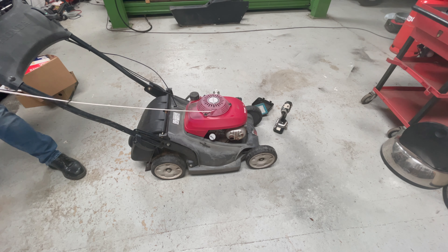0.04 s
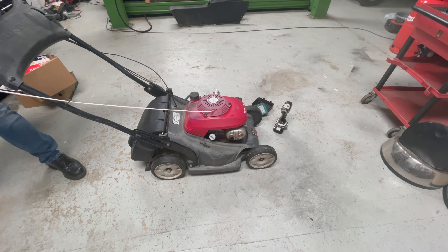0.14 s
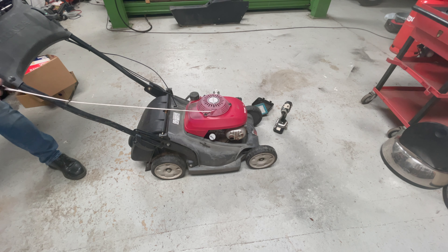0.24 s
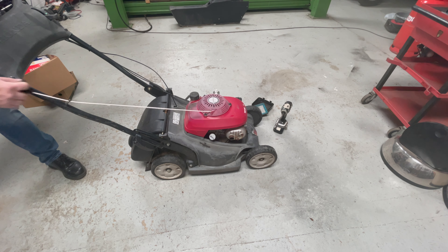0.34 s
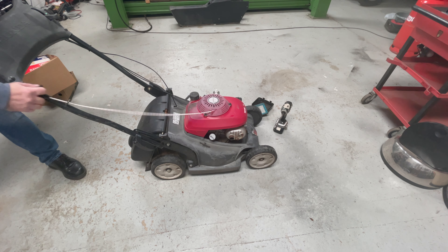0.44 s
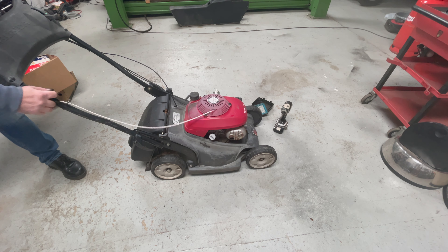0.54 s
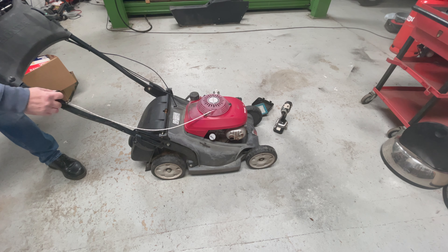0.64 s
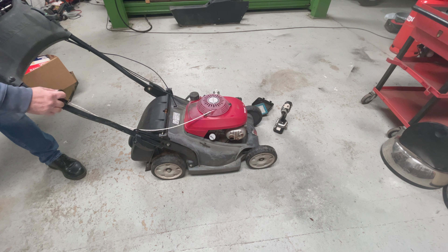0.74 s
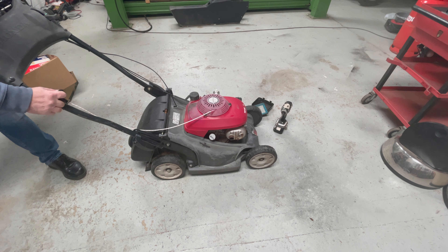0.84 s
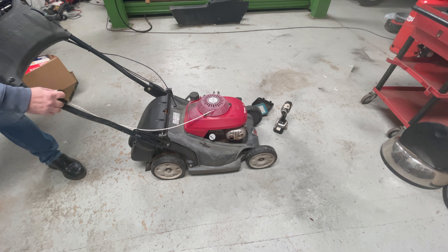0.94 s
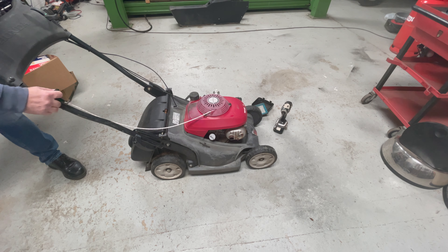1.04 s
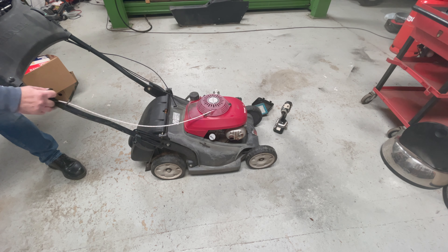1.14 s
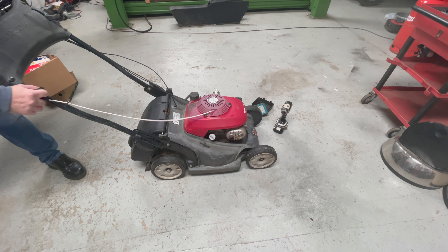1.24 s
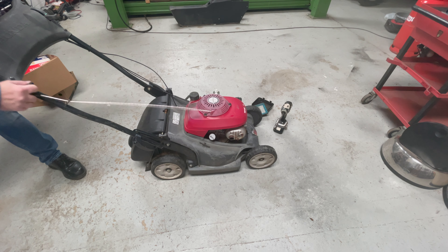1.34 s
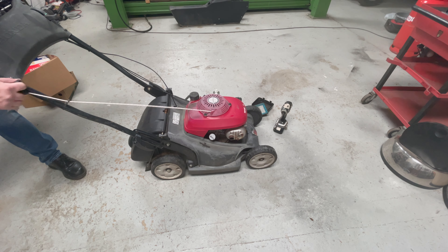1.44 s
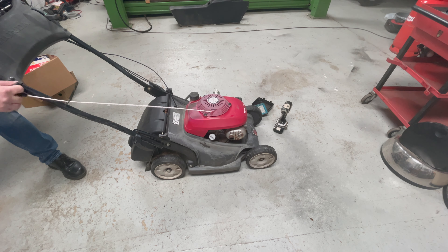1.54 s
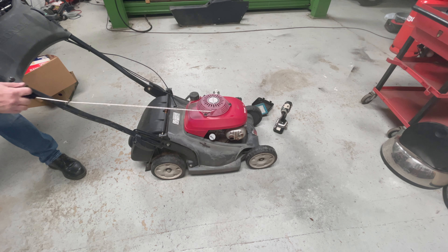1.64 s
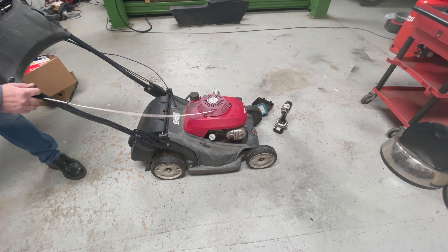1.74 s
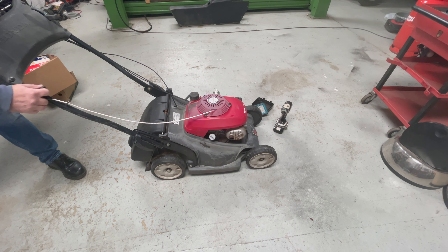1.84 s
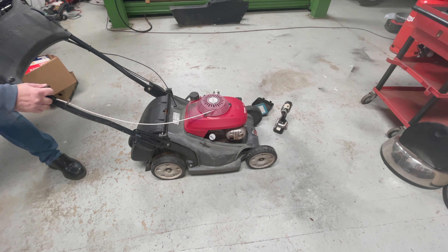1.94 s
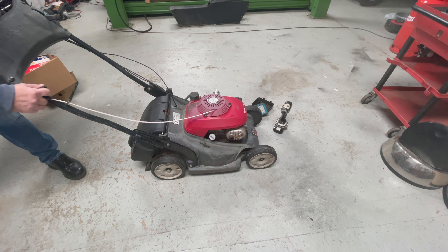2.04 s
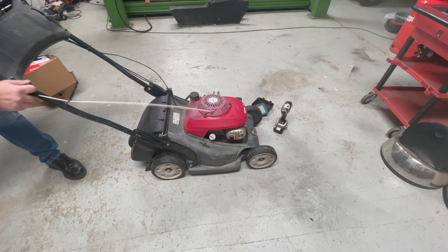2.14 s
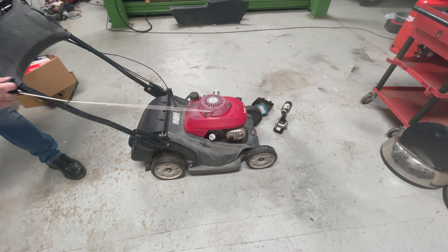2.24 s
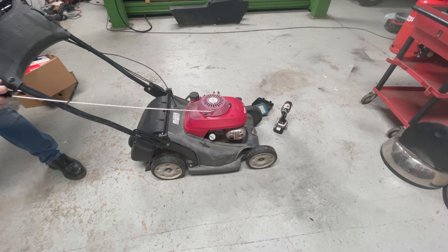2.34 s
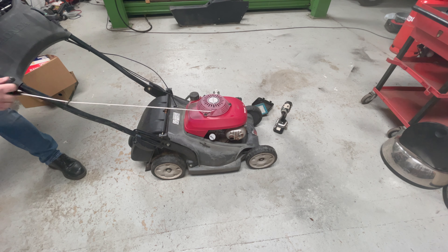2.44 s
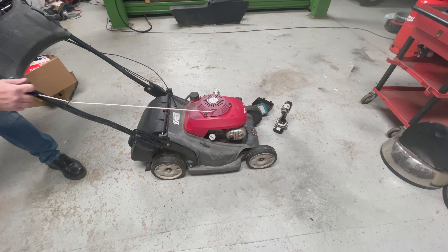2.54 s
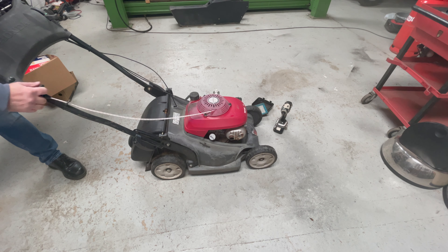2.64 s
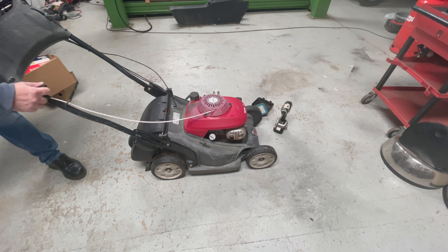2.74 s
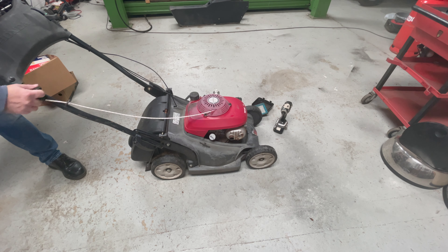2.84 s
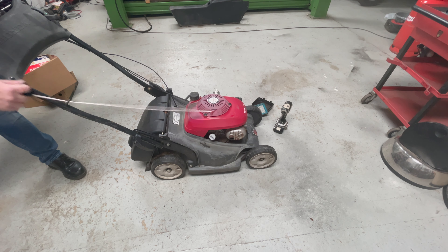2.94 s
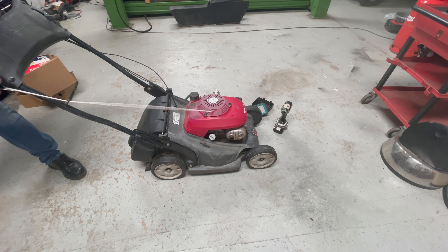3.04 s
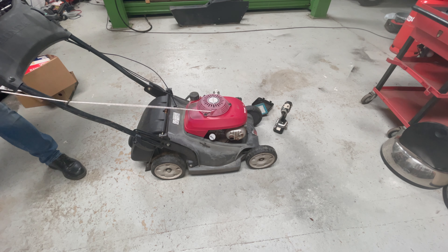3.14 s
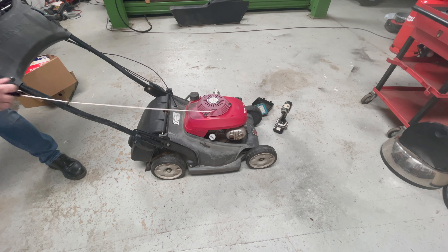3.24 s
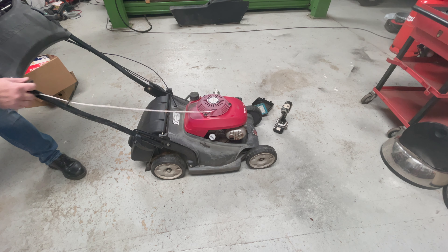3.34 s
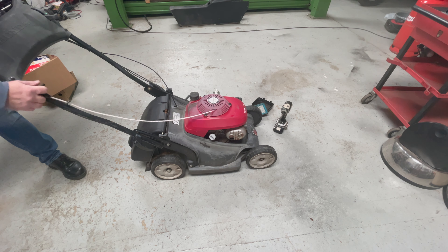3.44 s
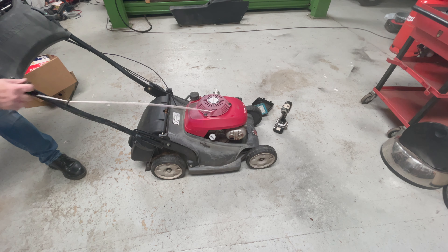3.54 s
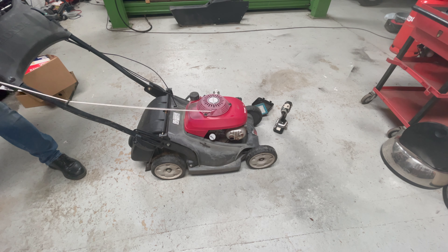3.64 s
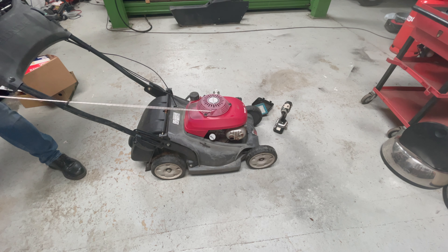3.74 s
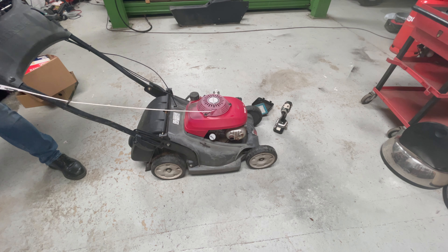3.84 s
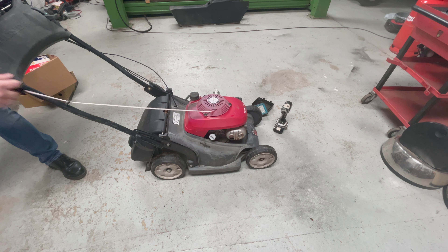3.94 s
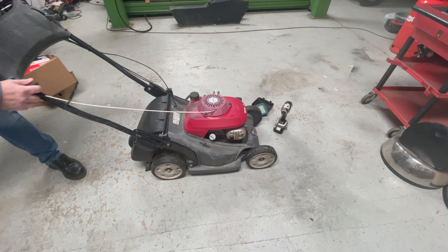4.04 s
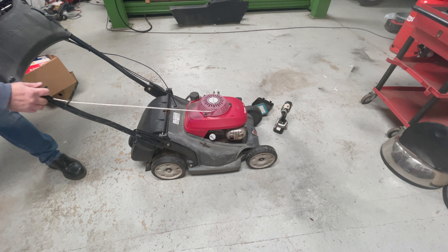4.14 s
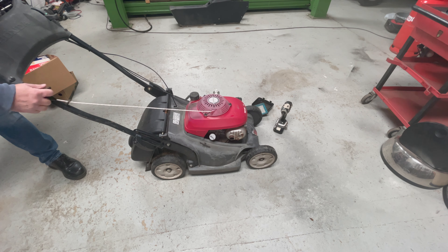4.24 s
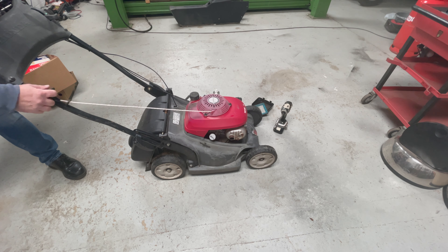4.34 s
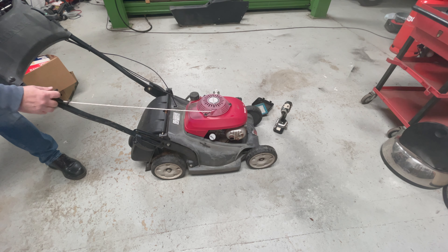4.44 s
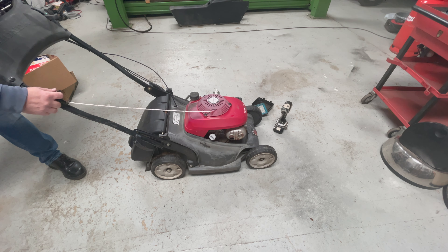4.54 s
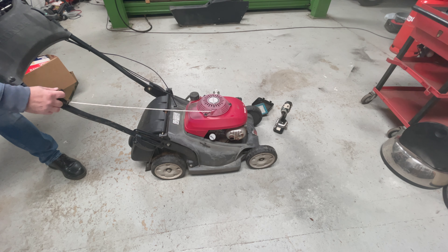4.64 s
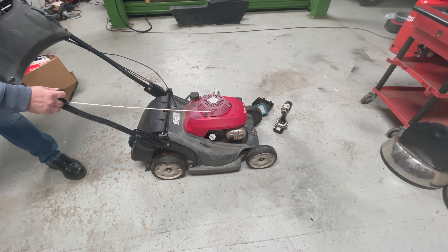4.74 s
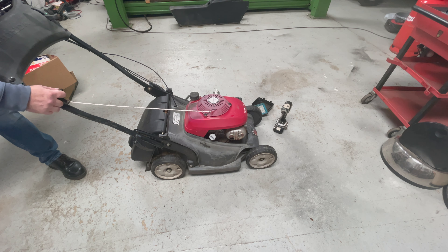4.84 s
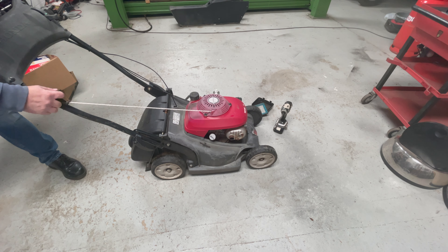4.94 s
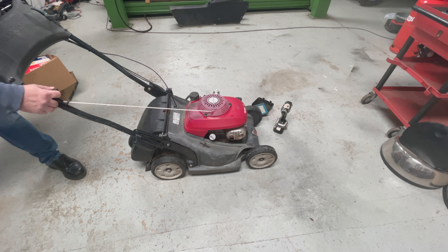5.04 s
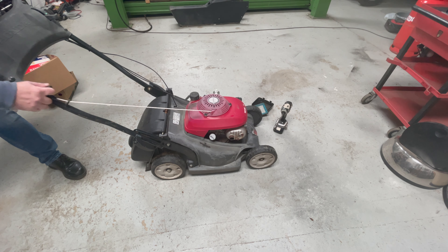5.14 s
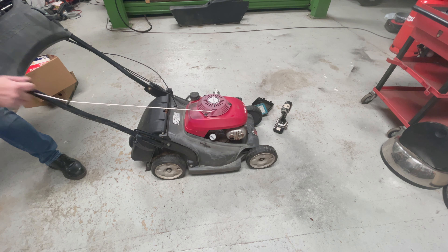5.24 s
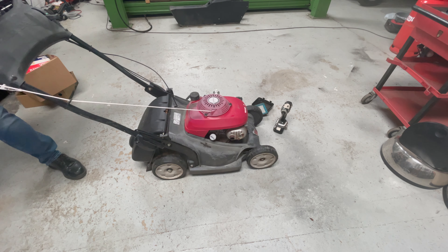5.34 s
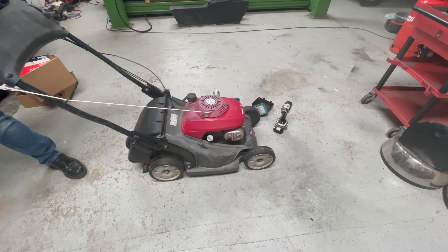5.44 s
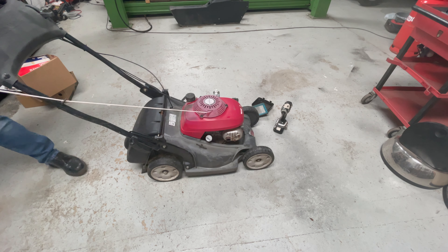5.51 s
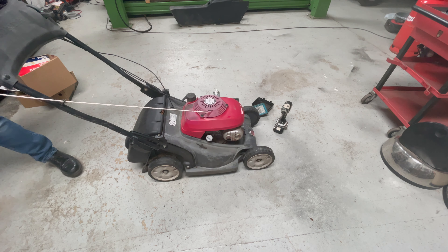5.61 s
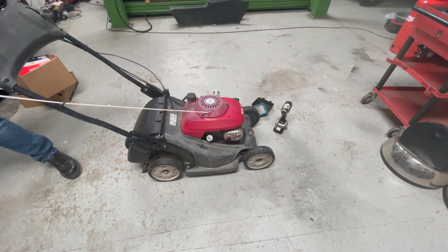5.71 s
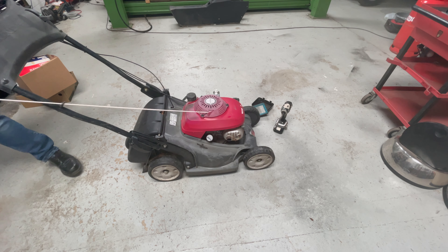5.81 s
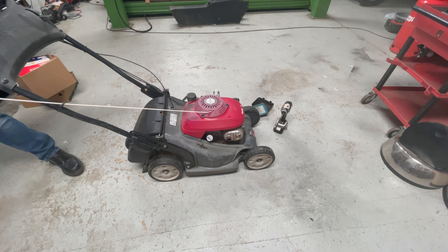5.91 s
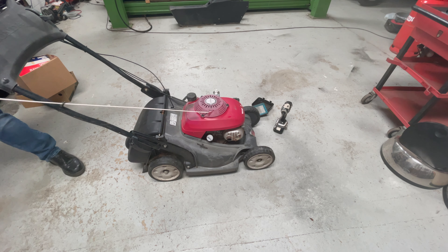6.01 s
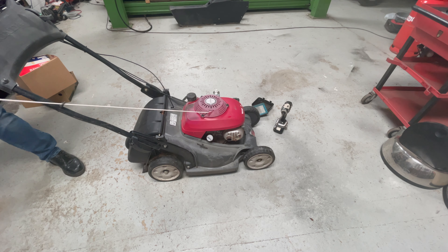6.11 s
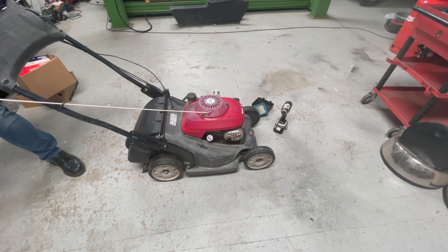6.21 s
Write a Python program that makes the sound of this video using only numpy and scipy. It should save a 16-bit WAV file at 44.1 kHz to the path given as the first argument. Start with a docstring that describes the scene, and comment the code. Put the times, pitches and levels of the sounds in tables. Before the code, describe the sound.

A mower's starter cord is eased out and let back in a garage, pawls clicking, then one hard yank cranks the engine without starting.

```python
"""Cranking a petrol lawn mower

In a garage a starter cord is eased out and let back several times: friction noise for cord and reel,
decaying noise bursts and sine modes for the steel pawls that clink and catch on the flywheel cup.
Then one hard pull spins the engine: it chuffs over compression as struck modes with puffs of noise,
shakes the deck and coasts while the cord runs back. Hard walls answer with a diffuse noise tail.
"""
import sys
import numpy as np
from scipy import signal
from scipy.fft import rfft, irfft, next_fast_len
from scipy.io import wavfile
from scipy.ndimage import uniform_filter1d, map_coordinates

SR = 44100
rng = np.random.default_rng(int(sys.argv[2]) if len(sys.argv) > 2 else 0)


def wav_out(sig):
    """Save sig, one row per channel (or a flat mono array), as 16-bit PCM at SR to the path in sys.argv[1]."""
    wavfile.write(sys.argv[1], SR, np.round(np.clip(np.atleast_2d(sig).T, -1, 1) * 32767).astype(np.int16))


N = 276507
TOP_HZ = 15900  # upper band limit

# A loose pawl drops on its stop: (time [s], relative level [dB])
CLINKS = [(1.1362, -49), (1.262, -65), (2.015, -53.5), (2.7856, -61.5)]
# Resonances of the starter housing: (frequency [Hz], width [Hz], relative level [dB])
HOUSING = [(350, 36, 0), (485, 32, -1), (685, 45, -2), (796, 45, -1), (945, 45, -4), (1135, 55, 1),
           (1225, 50, 1), (1420, 45, -1), (1610, 70, -2), (1830, 65, 0), (2380, 130, 0), (3520, 110, -1),
           (4100, 110, -3), (5100, 170, 1), (6930, 160, -3)]


def amp(db):
    """Level to amplitude ratio: 20 dB is a factor of ten."""
    return 10 ** (np.asarray(db) / 20)


def unit(x):
    """Normalisation to a root-mean-square of 1."""
    return x / np.sqrt(np.mean(x ** 2) + 1e-20)


def along(points, hz):
    """Linear interpolation of (frequency [Hz], value) points on a logarithmic frequency axis."""
    f, v = np.transpose(points)
    return np.interp(np.log(hz + 1), np.log(f + 1), v)


def wobble(rate):
    """Slow random modulation: a smooth curve through random knots, rate of them a second."""
    knots = rng.standard_normal(int(N * rate / SR) + 4)
    return map_coordinates(knots, [np.arange(N) * rate / SR])


def filtered(x, response):
    """Linear filtering: the spectrum of x times a response of frequency."""
    n = x.shape[-1]
    padded = next_fast_len(n + 8192, real=True)
    return irfft(rfft(x, padded) * response(np.fft.rfftfreq(padded, 1 / SR)), padded)[..., :n]


def resonant(peaks, hz):
    """Resonance: power sum of second-order band-pass peaks (centre [Hz], width [Hz], level [dB])."""
    power = 0
    for centre, width, db in peaks:
        detuning = (hz * hz - centre * centre) / (hz * width + 1e-6)
        power = power + amp(db) ** 2 / (1 + detuning ** 2)
    return np.sqrt(power)


def shape(spectrum):
    """Spectral envelope: the gain of (frequency [Hz], level [dB]) points as a function of frequency."""
    return lambda hz: amp(along(spectrum, hz))


def housed(spectrum, standing_db):
    """Source and resonator: a spectrum with the starter housing's resonances standing out of it."""
    return lambda hz: amp(along(spectrum, hz)) * np.hypot(1, amp(standing_db) * resonant(HOUSING, hz))


def noise(response, size=N):
    """Coloured noise: two unrelated random signals, together of rms 1."""
    return unit(filtered(rng.standard_normal((2, size)), response))


def burst(response, t60, attack):
    """High modal density: a cloud of modes, heard as noise, that swells and decays exponentially."""
    t = np.arange(SR // 2) / SR
    return noise(response, size=len(t)) * amp(-60 * t / t60) * (1 - np.exp(-t / attack))


def ring(modes, attack):
    """Modal vibration: decaying sines, with new strengths and phases at every blow."""
    t = np.arange(SR // 2) / SR
    tone = 0
    for hz, db, t60 in modes:
        decay = amp(db + rng.normal(0, 2.3) - 60 * t / t60)
        tone = tone + decay * np.sin(2 * np.pi * (hz * t + rng.random((2, 1))))
    return tone * (1 - np.exp(-t / attack))


def add(track, s, sound):
    """Superposition: mix a sound into the track at time s."""
    part = track[:, max(round(s * SR), 0):][:, :sound.shape[1]]
    part += sound[:, :part.shape[1]]


def scrape(response, rate, grain_db):
    """Sliding friction: noise broken into tiny slips, rate a second."""
    return unit(noise(response) * amp(grain_db * wobble(rate)))


def patchy(x, depth_db):
    """Random band modulation: each narrow band swells and fades on its own."""
    z = signal.stft(x, nperseg=512)[2]
    field = rng.standard_normal(z.shape[1:])
    field = uniform_filter1d(field, size=3, axis=0)  # over frequency
    field = uniform_filter1d(field, size=7, axis=1)  # over time
    return unit(signal.istft(z * amp(depth_db * unit(field)), nperseg=512)[1][:, :N])


def stroke(s, length, db, rise, fade_db_per_s, drag_db_per_s=0):
    """Speed envelope: a motion is up to speed at s, drags for its length and then dies away."""
    t = np.arange(N) / SR - s
    held_db = db - drag_db_per_s * np.clip(t, 0, length) - fade_db_per_s * np.maximum(t - length, 0)
    return amp(held_db) * np.exp(-(np.minimum(t, 0) / rise) ** 2)


def rumble():
    """Stationary background noise: the garage's quiet, low-pitched floor."""
    # Spectrum of the floor: (frequency [Hz], relative density [dB per Hz])
    floor_spectrum = [(15, -40), (28, -13), (48, -4.5), (60, 4.5), (78, -1), (110, -5), (210, -7.5),
                      (410, -11), (560, -22), (1000, -25.5), (2300, -28.5), (3200, -47), (5000, -41),
                      (5600, -50), (6800, -34), (7500, -48), (13000, -53), (16000, -62)]
    return amp(-61.5) * noise(shape(floor_spectrum))


def garage(x):
    """Diffuse reverberation: the walls' answer, each frequency decaying at its own speed."""
    # Reverberation time: (frequency [Hz], t60 [s])
    wall_decay = [(100, 0.79), (700, 0.51), (2000, 0.62), (5000, 0.68), (13000, 0.23)]
    hz, t, z = signal.stft(rng.standard_normal((2, SR)), SR, nperseg=256)
    decay = amp(-60 * t / along(wall_decay, hz)[:, None])
    build_up = 1 - np.exp(-t / 0.0049)
    tail = signal.istft(z * decay * build_up, SR, nperseg=256)[1]
    return signal.fftconvolve(x, tail / np.linalg.norm(tail[0]), axes=1)[:, :N]


def ports(pair):
    """Interchannel coherence: two signals become left and right, alike in the bass, out of step in the treble."""
    # Likeness of the channels: (frequency [Hz], coherence [0-1])
    coherence = [(60, .97), (200, .92), (430, .65), (850, .42), (1700, .35), (3500, .42), (6000, .25),
                 (8700, .42), (12000, .76)]
    # Phase by which the left leads: (frequency [Hz], lead [rad])
    phase_lead = [(60, .05), (200, .3), (430, .65), (850, 1.1), (1700, 1.0), (3500, 2.2), (6000, 2.9),
                  (8700, 2.2), (11500, .3)]
    # Level difference: (frequency [Hz], left minus right [dB])
    balance = [(60, -3), (200, -0.9), (850, 1.1), (3500, 1.6), (6400, 3.5), (8700, -4.5), (11500, -0.5)]

    def spread(hz):
        alike = np.clip(along(coherence, hz), 0, .99)
        lead = along(phase_lead, hz)
        common, apart = np.sqrt(1 + alike), np.sqrt(1 - alike)
        left = amp(along(balance, hz) / 2) * np.exp(.5j * lead)
        matrix = np.array([[common * left, apart * left], [common / left, -apart / left]])
        return matrix / np.sqrt(1 + alike * np.cos(lead))  # offsets gain or loss in the sum of the channels

    return filtered(pair, spread).sum(axis=1)


def cup(hz):
    """Resonance of a steel shell: the flywheel cup's response."""
    # Modes of the cup: (frequency [Hz], width [Hz], relative level [dB] before squaring)
    cup_modes = [(2400, 140, -3), (5950, 150, -6), (6600, 220, 0), (6980, 200, -4)]
    return resonant(cup_modes, hz) ** 2


def cord(whirr, rub, hiss, bright_db):
    """Friction and rattle: the reel rattles and jingles the pawls as the braid rubs and hisses in its guide."""
    # Spectrum of the reel in its housing: (frequency [Hz], relative density [dB per Hz])
    reel_spectrum = [(76, -34), (130, -4.5), (210, 4), (280, -3), (360, 1), (560, 0.5), (1200, -4.5),
                     (1650, -4), (2000, -8.5), (2450, -8.5), (3500, -19.5), (6000, -54)]
    # Spectrum of the cord rubbing its guide: (frequency [Hz], relative density [dB per Hz])
    rub_spectrum = [(1400, -47), (2300, -9), (3000, -2), (4500, 1.5), (5100, -1), (5700, -4.5),
                    (6300, -0.5), (7000, -6.5), (7450, -15), (9900, -8), (16000, -70)]
    # Spectrum of the hissing braid: (frequency [Hz], relative density [dB per Hz])
    hiss_spectrum = [(3800, -25), (6500, -2), (7000, 0), (7500, -8.5), (8200, 0), (9600, -1),
                     (10600, -15.5), (12000, -3.5), (13300, -5.5), (14300, -6.5), (16000, -21.5)]

    rattle = scrape(housed(reel_spectrum, standing_db=0), rate=260, grain_db=1.5)
    reel = amp(-1.5) * whirr * patchy(rattle, depth_db=2.5)
    jingle = amp(-27.5) * whirr * noise(cup)
    rubbing = scrape(housed(rub_spectrum, standing_db=2), rate=420, grain_db=1)
    guide = amp(2.0) * rub * patchy(rubbing, depth_db=2.5)
    # bright_db lifts or lowers the top treble
    braid = lambda hz: amp(along(hiss_spectrum, hz) + bright_db * (hz / TOP_HZ) ** 4)
    hissing = scrape(braid, rate=1100, grain_db=2.0)
    fibres = amp(1.5) * hiss * patchy(hissing, depth_db=4.5)
    return reel + jingle + guide + fibres


def easing():
    """Speed-dependent friction: tugs mostly hiss, the reel mostly whirrs; its rub and hiss die first."""
    # The hand draws the cord through its guide: (time [s], length [s], relative hiss level [dB])
    tugs = [(0.0, .045, -50.5), (0.3, .025, -51.5), (1.36, .04, -63), (1.55, .08, -63), (2.14, .06, -58),
            (2.44, .06, -58.5), (2.98, .045, -53), (3.125, .015, -62), (3.19, .1, -57.5), (3.57, .08, -51),
            (3.86, .11, -53), (4.06, .04, -65), (4.28, .06, -70), (5.0, .06, -70), (5.11, .05, -62),
            (5.2, .02, -55), (6.0, .05, -54), (6.17, .1, -49.5)]
    # The reel is set spinning and runs down: (time [s], length [s], relative whirr level [dB])
    spins = [(0.03, .54, -44), (1.16, .02, -68), (1.38, .26, -55.3), (2.14, .36, -51.8), (2.72, .15, -63.5),
             (2.94, .46, -51.6), (3.68, .88, -47.2), (4.89, .08, -65), (5.07, .14, -55.5),
             (5.99, .28, -44.3)]
    tug_rise_s, tug_fade_db_per_s = .035, 215
    tug_whirr_db, tug_rub_db = -2.5, -6.5  # beside the hiss
    spin_rise_s, spin_drag_db_per_s, spin_stop_db_per_s = .03, 14, 54
    brisk_db = -45  # the whirr of a briskly turning reel
    spin_rub_db, rub_power = -11.3, 1.6  # beside a brisk whirr; exponent of the speed
    spin_hiss_db, hiss_power = -21, 1.9  # likewise

    tug = np.sqrt(sum(stroke(*row, tug_rise_s, tug_fade_db_per_s) ** 2 for row in tugs))
    spin = np.sqrt(sum(stroke(*row, spin_rise_s, spin_stop_db_per_s, spin_drag_db_per_s) ** 2
                       for row in spins))
    speed = spin / amp(brisk_db)
    whirr = np.hypot(amp(tug_whirr_db) * tug, spin)
    rub = np.hypot(amp(tug_rub_db) * tug, amp(brisk_db + spin_rub_db) * speed ** rub_power)
    hiss = np.hypot(tug, amp(brisk_db + spin_hiss_db) * speed ** hiss_power)
    return cord(whirr, rub, hiss, bright_db=-3)


def spring():
    """Stick-slip: the coils tick against their case as the cord winds in, and the housing rings on."""
    # The rewind spring's coils slip: (time [s], relative level [dB])
    slips = [(0.036, -37), (2.277, -49), (3.861, -44), (3.921, -44), (4.052, -37), (4.099, -37.5),
             (4.205, -37.5), (4.335, -38), (4.522, -38)]
    # Spectrum of a tick: (frequency [Hz], relative density [dB per Hz])
    tick_spectrum = [(290, -49), (500, -6), (1270, 1.5), (2100, -9), (2470, -4), (3090, -16), (4990, -18),
                     (5480, -29), (6510, -13.5), (9450, -23), (10800, -30), (12000, -26), (15600, -64),
                     (22000, -120)]
    out = np.zeros((2, N))
    tick = shape(tick_spectrum)
    housing = lambda hz: tick(hz) * resonant(HOUSING, hz) ** 2
    for s, db in slips:
        add(out, s, amp(db - 4) * burst(tick, t60=0.049, attack=0.00095))
        add(out, s, amp(db - 10.5) * burst(housing, t60=0.15, attack=.002))
    return out


def contacts():
    """Impact and damping: rows (s, knock, clack, crack, ring dB); a free pawl rings, a held one barely."""
    # A pawl catches in the flywheel cup: (time [s], relative clack level [dB])
    catches = [(0.63, -41.3), (1.306, -40.5), (1.655, -45), (2.107, -32.5), (2.896, -32.5), (3.504, -33.5),
               (4.979, -49.5)]
    # The loaded starter jolts with its pawls held fast:
    # (time [s], crack [dB], housing clack [dB], deck knock [dB]), all relative levels
    jolts = [(1.325, -39, -35.5, -60), (3.607, -23.3, -40, -53), (3.629, -22, -31, -35),
             (5.221, -23.5, -38.5, -44), (5.242, -12.5, -23.5, -29), (5.452, -22.5, -38, -35),
             (5.515, -27, -37, -45), (5.546, -21.5, -29, -34), (5.567, -18.5, -29, -41),
             (5.609, -23, -37, -30), (5.639, -22, -29, -35), (5.798, -26.5, -38, -49),
             (5.85, -31.5, -36.5, -31), (5.937, -32.5, -39.5, -42), (6.245, -37, -42, -52)]
    firm_db = -33  # clack of a firm catch
    catch_knock_db, catch_crack_db, catch_ring_db = -13, -3, -9.5  # beside that clack
    hardening = 1.35  # knock, crack and ring grow faster with force than the clack
    jolt_ring_db = -26  # beside the crack

    rows = []
    for s, db in catches:
        hard_db = firm_db + hardening * (db - firm_db)
        rows.append((s, hard_db + catch_knock_db, db, hard_db + catch_crack_db, hard_db + catch_ring_db))
    for s, crack_db, clack_db, knock_db in jolts:
        rows.append((s, knock_db, clack_db, crack_db, crack_db + jolt_ring_db))
    return rows


def pings():
    """Free vibration: every contact sets the small steel pawl ringing in its modes."""
    # Modes of the steel pawl: (frequency [Hz], relative level [dB], t60 [s])
    pawl_modes = [(2390, -19, .15), (4040, -26, .1), (6545, -5, .07), (6595, 0, .11), (6670, -10, .08)]
    out = np.zeros((2, N))
    for s, *_, ring_db in contacts():
        add(out, s, amp(ring_db + 4.5) * ring(pawl_modes, attack=0.0022))
    for s, db in CLINKS:
        add(out, s, amp(db - 4.5) * ring(pawl_modes, attack=.002))
    return out[:1]  # one channel


def pawls():
    """Impact excitation: a pawl scuffs along the cup, cracks home, clacks the housing and knocks the deck."""
    # Spectrum of the steel crack: (frequency [Hz], relative density [dB per Hz])
    crack_spectrum = [(1200, -27), (2000, 0.5), (2400, -0.5), (3500, -3), (5100, -2), (5700, -4),
                      (6800, 0.5), (7500, -2), (9400, -2.5), (10700, -10), (13300, -7.5), (16000, -20)]
    # Spectrum of the housing's clack: (frequency [Hz], relative density [dB per Hz])
    clack_spectrum = [(200, -1), (400, 0), (800, 3), (1600, -2), (2600, -10.5), (4000, -11.5), (6000, -18),
                      (9000, -60)]
    # Modes of the deck: (frequency [Hz], width [Hz], relative level [dB] before squaring)
    deck_modes = [(211, 38, -2.5), (350, 30, -7), (497, 22, -5.5)]
    out = np.zeros((2, N))
    crack = housed(crack_spectrum, standing_db=1.5)
    clack = housed(clack_spectrum, standing_db=-5)
    knock = lambda hz: resonant(deck_modes, hz) ** 2
    for s, knock_db, clack_db, crack_db, ring_db in contacts():
        add(out, s - .006, amp(clack_db - 14) * burst(crack, t60=0.077, attack=0.007))  # scuff
        add(out, s, amp(crack_db - 4.5) * burst(crack, t60=0.048, attack=0.00083))
        add(out, s, amp(clack_db + 2.5) * burst(clack, t60=.08, attack=0.0043))
        add(out, s, amp(knock_db + 0.5) * burst(knock, t60=0.18, attack=0.0063))
        add(out, s, amp(ring_db + 3.5) * burst(cup, t60=0.077, attack=.0015))
    for s, db in CLINKS:
        add(out, s, amp(db - 20) * burst(crack, t60=0.045, attack=.001))
    return out


def piston():
    """Pulsed flow into cavities: each push of air thumps the airbox, rings the muffler and leaves as a puff."""
    # The piston pushes air through the engine:
    # (time [s], relative puff level [dB], low thump beside it [dB])
    chuffs = [(2.022, -56, 7), (2.058, -58, 5), (3.392, -52, 1), (3.632, -27.5, -5.5), (5.342, -13, -4),
              (5.373, -36, 9), (5.410, -22, -9), (5.475, -33, -10), (5.621, -38, 6), (5.696, -21, -5),
              (5.852, -39, 7.5), (5.955, -34.5, -14)]
    # Modes of the airbox: (frequency [Hz], relative level [dB], t60 [s])
    airbox = [(140, -4, .09), (176, 0, .12)]
    # Modes of the muffler: (frequency [Hz], relative level [dB], t60 [s])
    muffler = [(285, -5, .07), (349, -4, .1), (428, -3, .08), (488, 0, .12), (570, -2, .08), (645, -4, .09),
               (688, 0, .09), (736, -1, .1), (906, -8, .08), (1110, -8, .09)]
    # Spectrum of the escaping puff: (frequency [Hz], relative density [dB per Hz])
    puff_spectrum = [(70, -33), (150, -10), (400, 2.5), (750, -10), (1200, -8), (2500, -14), (6000, -48)]
    out = np.zeros((2, N))
    for s, db, thump_db in chuffs:
        add(out, s, amp(db + thump_db - 2) * ring(airbox, attack=0.0027))
        add(out, s, amp(db - 5) * ring(muffler, attack=0.0026))
        add(out, s, amp(db - 13.5) * burst(shape(puff_spectrum), t60=0.11, attack=0.00077))
    return out


def hard_pull():
    """Forced motion, then free decay: the cord races, the crank churns, the deck rocks; all coast down."""
    # Motions of reel, crankcase and deck, then of the cord's hiss and rub: (time [s], length [s],
    # relative level [dB], rise [s], coasting [dB per s], drag [dB per s; negative gathers speed])
    reel_motion = (5.38, .25, -29.3, .06, 60, 5)
    crank_motion = (5.39, .35, -31.5, .025, 65, 11)
    deck_motion = (5.46, .39, -41, .06, 42, 9)
    hiss_motion = (5.27, .36, -41.7, .015, 70, -7)
    rub_motion = (5.27, .35, -46, .015, 52, -20)
    # The deck drops back on its wheels: (time [s], relative level [dB])
    drops = [(5.445, -35), (5.645, -33.5)]
    # Spectrum of the churning crank: (frequency [Hz], relative density [dB per Hz])
    churn_spectrum = [(53, -41), (90, -7), (155, 4), (215, 2.5), (265, -2), (307, -3), (348, 9.5),
                      (394, -5), (471, 0), (517, -17), (569, 8.5), (724, -23), (787, 4), (847, -6),
                      (1100, -6.5), (1430, -43), (2420, -120)]
    # Spectrum of the shaking deck: (frequency [Hz], relative density [dB per Hz])
    shake_spectrum = [(15, -52), (30, -24), (42, -15), (56, 4.5), (75, -7), (130, -6.5), (180, -27),
                      (290, -70)]
    drop_s, drop_rise_s, drop_fade_db_per_s = .02, .012, 250

    bumps = sum(stroke(s, drop_s, db, drop_rise_s, drop_fade_db_per_s) for s, db in drops)
    deck = np.hypot(stroke(*deck_motion), bumps) * noise(shape(shake_spectrum))
    churn = scrape(shape(churn_spectrum), rate=70, grain_db=3.5)
    crank = amp(-4) * stroke(*crank_motion) * churn
    racing = cord(stroke(*reel_motion), stroke(*rub_motion), stroke(*hiss_motion), bright_db=6.5)
    return deck + crank + racing


def scene():
    """Direct and reverberant sound: mower, echo and rumble; the pings arrive almost dry, from the left."""
    blows = pawls() + spring() + piston()
    ping = pings()
    echo = garage(amp(-4) * blows + amp(-20) * ping)
    mower = blows + easing() + hard_pull()
    return ports(mower + echo + rumble()) + ping * amp([[2], [-2]])  # left and right gain [dB]


def record(dry):
    """Band limitation: nothing passes above the upper limit."""
    return filtered(dry, lambda hz: hz < TOP_HZ)


dry = scene()
out = record(dry)
wav_out(out)
```